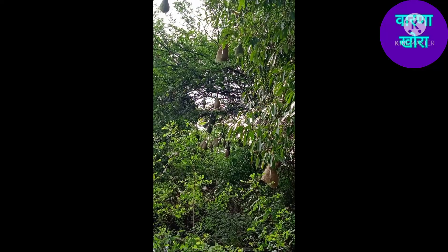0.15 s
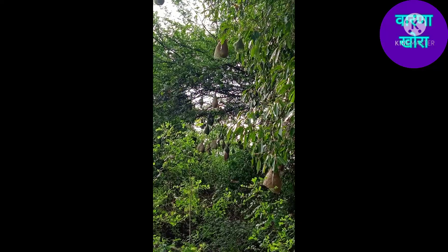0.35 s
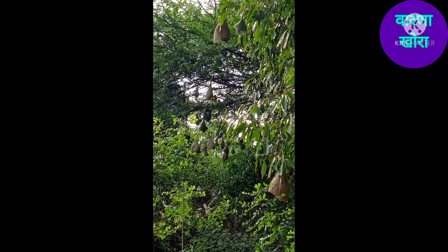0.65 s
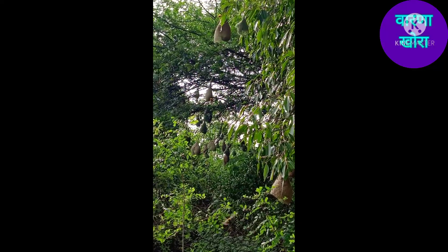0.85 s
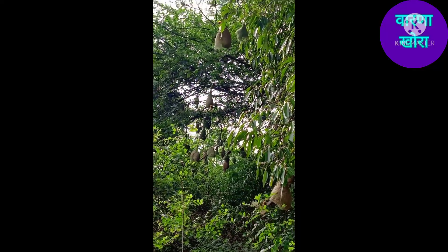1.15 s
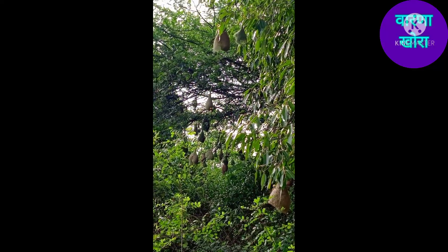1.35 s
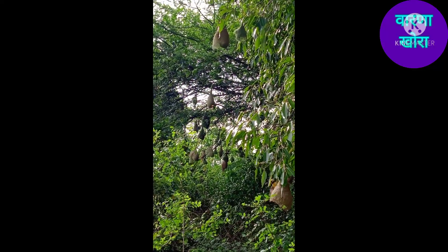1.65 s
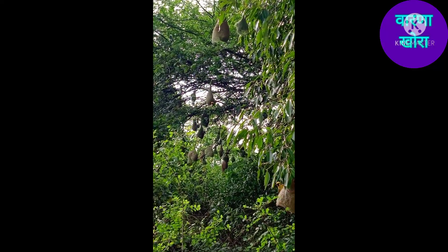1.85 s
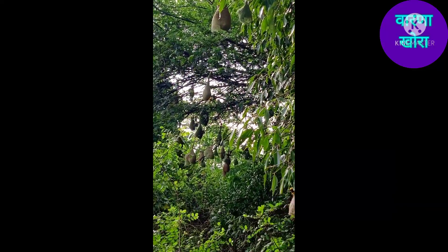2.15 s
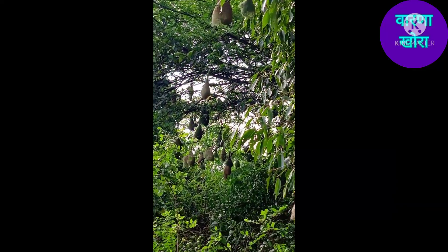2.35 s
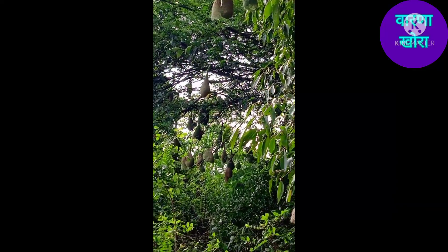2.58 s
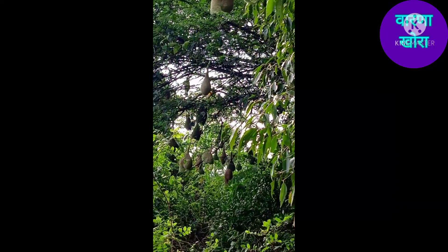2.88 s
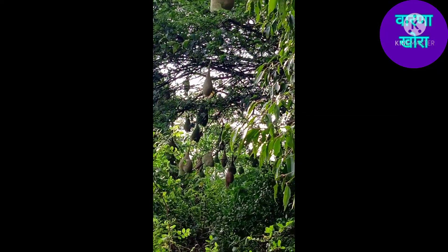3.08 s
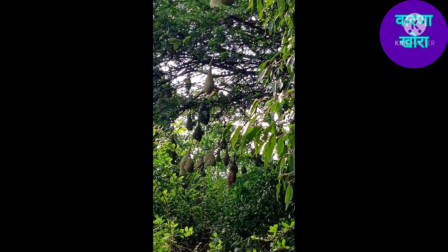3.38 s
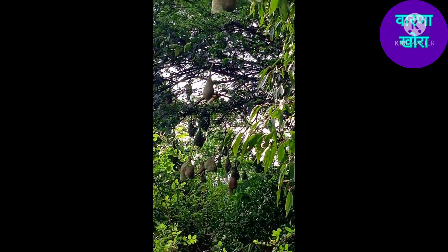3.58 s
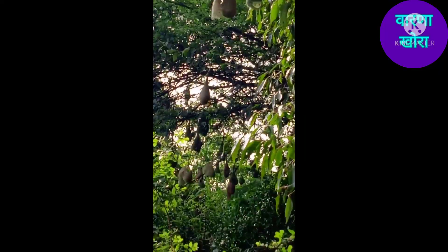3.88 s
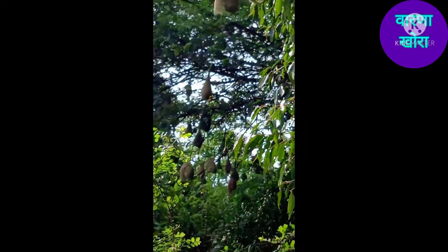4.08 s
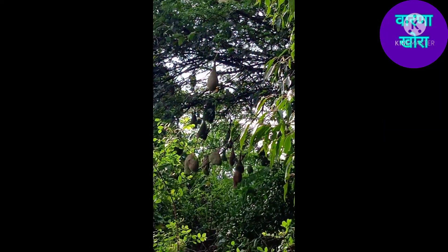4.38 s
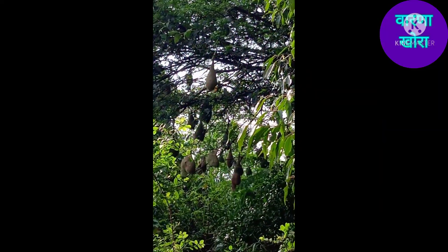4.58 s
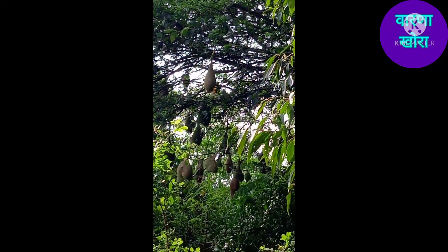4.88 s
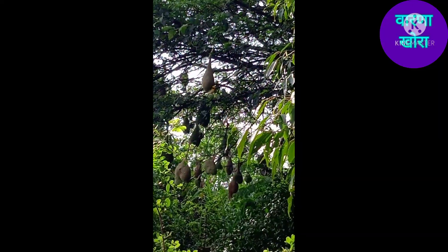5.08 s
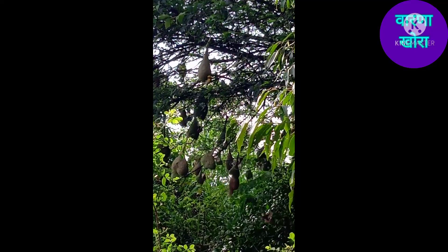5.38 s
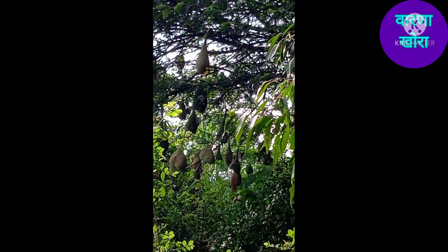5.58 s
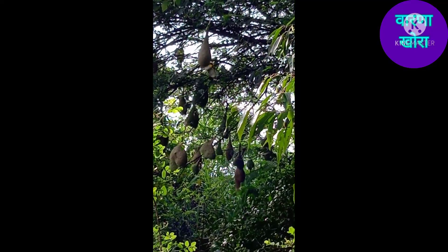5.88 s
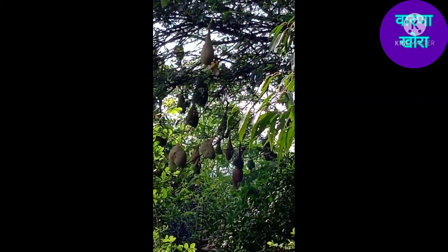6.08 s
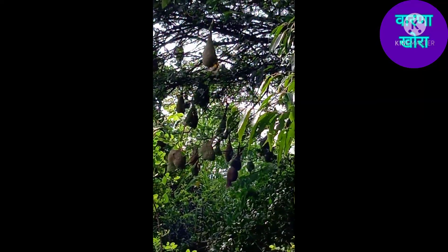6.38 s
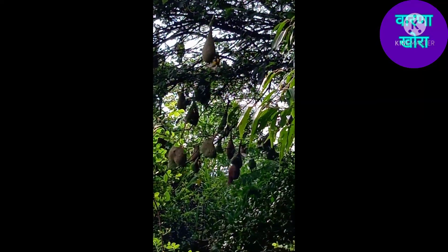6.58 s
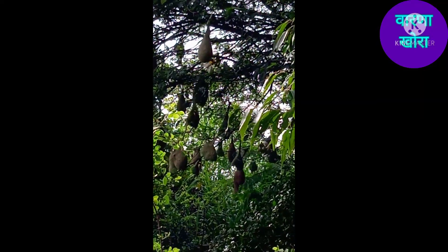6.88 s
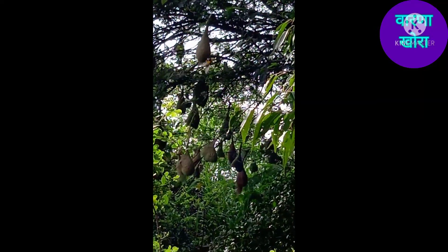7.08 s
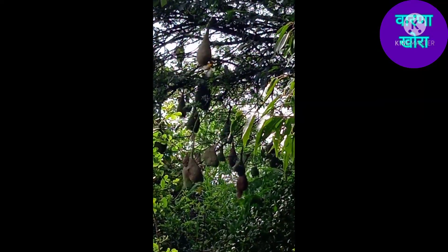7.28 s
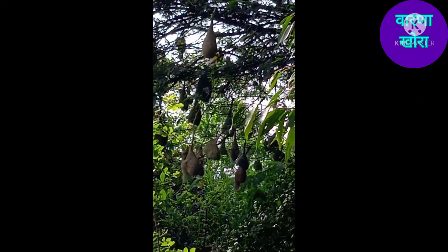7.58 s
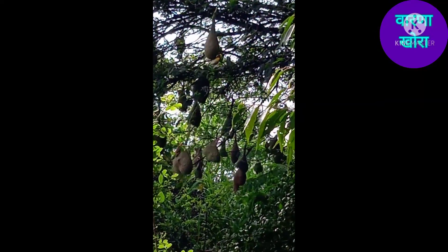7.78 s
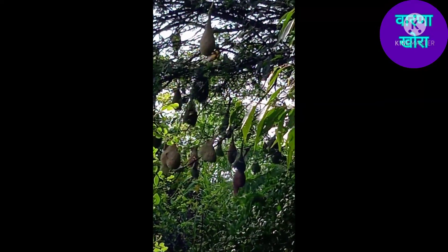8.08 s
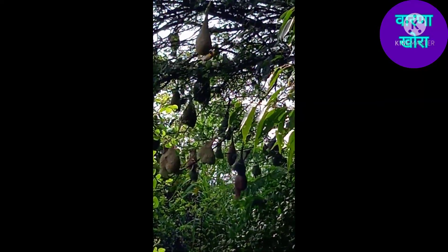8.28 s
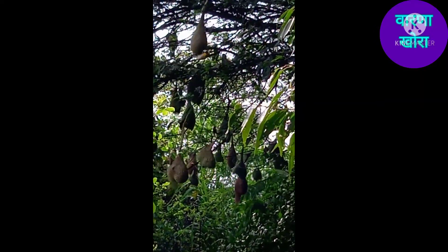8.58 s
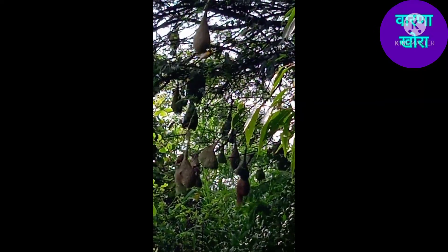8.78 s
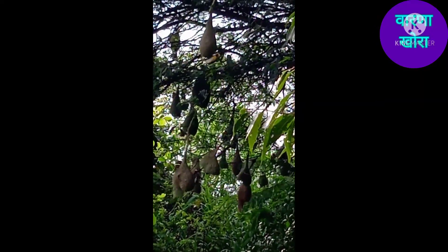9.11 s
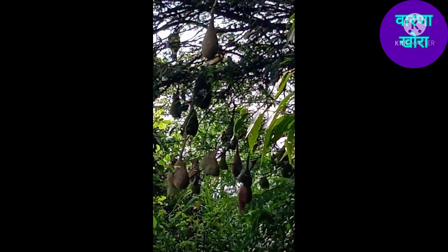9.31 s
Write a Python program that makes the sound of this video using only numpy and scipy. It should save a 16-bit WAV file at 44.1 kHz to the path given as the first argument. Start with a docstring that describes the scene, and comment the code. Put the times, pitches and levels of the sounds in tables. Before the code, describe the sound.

Outdoors in dense greenery, dozens of small birds twitter together around their nests, the chorus pulsing several times a second but never stopping. Early on, raspy chips and sharp cheeps stand out; the middle grows busier, with a strong falling wheeze near six seconds. Afterward come brief clean whistles, reedy buzzing notes and a bright whistle around seven and a half seconds. Faint outdoor air lies beneath; the microphone hears the flock at moderate distance with a few birds closer.

```python
"""Weaver bird colony in thorn trees

A colony chatters without a break; groups join in short bouts of thin high notes, cheeps and falling chips.
Nearer birds stand out with chips, cheeps, reedy calls, clean whistles and one long falling wheeze.
Each voice is a harmonic tone modulated in frequency and amplitude; raspy calls also carry a noise hiss.
Decaying noise echoes stand for leaves and branches that scatter every call.
Shaped noise gives the faint outdoor rumble, the high sizzle and two soft rustles; sines give a faint hum."""
import sys
import numpy as np
from scipy import signal
from scipy.fft import rfft, irfft, next_fast_len
from scipy.io import wavfile
from scipy.ndimage import uniform_filter1d, map_coordinates

SR = 44100
rng = np.random.default_rng(int(sys.argv[2]) if len(sys.argv) > 2 else 0)


def digitize_waveform(pressure):
    """Quantize a signal to 16-bit integers and store it at the path in sys.argv[1].

    Rows of a 2-D input are taken as channels; values are limited to [-1, 1].
    """
    field = np.atleast_2d(pressure).T
    bounded = np.clip(field, -1, 1)
    quanta = np.round(bounded * 32767).astype(np.int16)
    wavfile.write(sys.argv[1], SR, quanta)


N = 416744
TIME = np.arange(N) / SR
TOP_HZ = 15550  # upper band limit

# Spectrum of still outdoor air: frequency_hz, relative_density_db
AIR_SPECTRUM = [(25, -16), (45, -20), (58, 4.5), (80, -1), (150, -3), (250, -13), (550, -16.5), (950, -15),
                (1300, -17), (8000, -28), (12500, -36.5), (15000, -32)]
# Lines of a faint far-off hum: frequency_hz, relative_level_db
HUM_LINES = [(288, -2.5), (346, -2), (403, -3.5), (461, -4)]
# Level of the hum: time_s, level_db
HUM_LEVEL = [(0, -88), (.8, -84), (1.4, -83), (2, -92), (9.4, -92.5)]
# Strokes of soft rustling: start_s, length_s, peak_level_db
RUSTLES = [(2.146, 0.35, -73.5), (6.641, 0.048, -70.5)]
# Spectrum of the rustling: frequency_hz, relative_density_db
RUSTLE_SPECTRUM = [(100, -19), (800, 1), (2500, -9), (8000, -43)]
# Level of the thin, high sizzle above the chorus: time_s, level_db
SIZZLE_LEVEL = [(0, -71), (.8, -73), (1.6, -87), (4.3, -85), (5.3, -80.5), (5.65, -66.5), (5.88, -63.5),
                (6.3, -74), (6.8, -83), (8.8, -98), (9.4, -68)]
# Spectrum of the sizzle: frequency_hz, relative_density_db
SIZZLE_SPECTRUM = [(6000, -21), (7500, 3), (9500, 4), (12800, -11), (15000, 1)]
# Decay time of the echo from the farther trees: frequency_hz, t60_s
TREE_DECAY = [(4000, 0.67), (12000, 0.28)]
# Spectrum of the hiss that rides on a raspy call: frequency_hz, relative_density_db
RASP_SPECTRUM = [(3000, -30), (7000, -5), (8000, -6), (9600, -2), (11300, -11), (13200, -17), (15000, -1)]
# Strength with which the farthest birds are heard at each pitch: frequency_hz, relative_level_db
CARRY_SPECTRUM = [(1100, -45), (1500, -22.5), (2000, -17.5), (2550, -8), (3700, -2), (5100, 3),
                  (6600, -10.5), (7300, -21.5), (9000, -51)]
# Level of the far birds' low chirps: time_s, level_db
LOW_BIRD_LEVEL = [(0, -64), (1.5, -76), (3, -75.5), (4.5, -72), (5.6, -67.5), (7.2, -63), (8.6, -72),
                  (9.4, -65.5)]
# Unbroken chatter of the colony, before the offset of each kind of call: time_s, relative_level_db
CHATTER_LEVEL = [(0, -46.5), (.8, -49.5), (1.42, -57), (2.05, -55.5), (2.4, -54), (2.6, -57.5), (2.77, -52),
                 (3.05, -52.5), (3.85, -53.5), (4.33, -62), (4.7, -53.5), (5.6, -48), (6, -49),
                 (6.8, -53.5), (8.05, -50.5), (8.3, -56), (8.7, -51.5), (9.45, -52.5)]
# Bouts of a group calling together, before the same kind of offset:
# start_s, length_s, cheep_relative_level_db, chip_relative_level_db
BOUTS = [(-0.04, 0.088, -48.5, -52), (0.185, 0.31, -47.5, -57), (0.458, 0.16, -50, -55),
         (0.594, 0.23, -42.5, -53), (0.75, 0.19, -50, -53.5), (0.904, 0.22, -47.5, -48),
         (1.118, 0.24, -49, -54), (1.281, 0.16, -43.5, -55.5), (1.423, 0.25, -49.0, -49.5),
         (1.71, 0.17, -51, -51.0), (1.91, 0.29, -50.5, -65), (2.19, 0.13, -52, -58), (2.42, 0.27, -50, -61),
         (2.783, 0.25, -52.5, -53.0), (3.007, 0.37, -47.5, -69), (3.447, 0.23, -51.5, -66),
         (3.684, 0.14, -51.5, -55.5), (3.898, 0.22, -49.5, -52), (4.094, 0.093, -46, -45),
         (4.174, 0.22, -57.5, -51), (4.364, 0.26, -48, -48.5), (4.598, 0.44, -44.5, -51.5),
         (5.0, 0.32, -43.5, -53), (5.272, 0.26, -44, -47), (5.646, 0.38, -43, -59), (6.07, 0.097, -44, -67),
         (6.16, 0.26, -48.5, -61), (6.58, 0.22, -49.5, -61), (6.902, 0.26, -49, -73),
         (7.074, 0.21, -71, -53), (7.273, 0.096, -47, -48), (7.43, 0.17, -59, -51.5),
         (7.66, 0.23, -54.5, -55), (7.977, 0.3, -49.5, -53.5), (8.315, 0.3, -50.5, -51.5),
         (8.73, 0.3, -47.5, -66), (9.07, 0.16, -49, -68), (9.187, 0.51, -48.5, -59)]
# Near raspy chips: start_s, length_s, start_pitch_hz, end_pitch_hz, relative_level_db
CHIPS = [(0, 0.12, 4120, 2740, -42.5), (0.29, 0.12, 5140, 3620, -45), (0.94, 0.1, 5480, 3670, -43),
         (1.02, 0.092, 4270, 2530, -47.5), (1.37, 0.046, 6120, 5260, -45.5),
         (1.495, 0.039, 4400, 2630, -43.5), (1.57, 0.12, 3850, 3105, -47.5), (1.71, 0.038, 6000, 3410, -45),
         (1.775, 0.04, 4610, 2670, -49.5), (2.07, 0.053, 4800, 2580, -49), (2.14, 0.047, 6100, 5000, -47.5),
         (2.21, .06, 6000, 4860, -48), (2.438, 0.029, 5740, 4430, -43), (2.47, 0.034, 3500, 2690, -45.5),
         (2.83, 0.033, 5030, 2560, -46.5), (3.085, 0.033, 4200, 2500, -48), (3.43, 0.039, 3940, 2660, -49),
         (3.917, 0.0262, 5950, 4880, -40.5), (4.12, 0.028, 5500, 4670, -39.5),
         (4.14, 0.033, 4950, 2980, -51), (4.165, 0.036, 3600, 3320, -46.5), (4.265, 0.027, 3450, 3270, -48),
         (4.65, 0.035, 5900, 4620, -44), (4.76, 0.09, 4060, 3504, -46.5), (5.05, 0.082, 4110, 3330, -43.5),
         (5.13, 0.064, 3900, 2904, -44.5), (5.54, 0.038, 4220, 3440, -42), (5.72, 0.064, 5810, 3690, -40),
         (6.385, 0.016, 4120, 3200, -46.5), (7.335, 0.025, 3840, 2790, -44.5),
         (7.425, 0.035, 4220, 3830, -45.5), (7.45, 0.029, 3900, 3040, -43), (8.17, 0.058, 2100, 1570, -65),
         (8.85, 0.037, 2200, 1540, -66), (8.98, 0.021, 3680, 3410, -47.5), (9.12, 0.019, 3480, 3380, -47),
         (9.255, 0.03, 3700, 3260, -47.5)]
# Near held cheeps: start_s, length_s, mid_pitch_hz, relative_level_db
CHEEPS = [(.06, 0.044, 6560, -53), (0.217, 0.13, 4800, -48), (0.467, 0.071, 5250, -45),
          (0.541, 0.032, 4940, -41.5), (0.588, 0.036, 6730, -60), (0.666, 0.058, 5280, -41),
          (0.798, 0.13, 4940, -40.5), (1.218, 0.055, 4955, -44), (1.303, 0.017, 5090, -38.5),
          (1.311, .04, 6430, -55), (1.335, 0.06, 5050, -49), (1.474, 0.053, 4950, -44.5),
          (1.749, 0.062, 5085, -45), (2.001, 0.14, 4860, -45.5), (2.064, 0.02, 5120, -39),
          (2.577, 0.12, 4920, -49), (2.697, 0.032, 4800, -46), (2.808, 0.025, 5160, -39),
          (3.06, 0.03, 5030, -45.5), (3.778, 0.086, 4930, -48.5), (4.419, 0.03, 5100, -45.5),
          (4.52, 0.063, 4870, -41.5), (4.91, 0.083, 5100, -41), (5.181, 0.08, 4980, -41.5),
          (5.699, 0.046, 6260, -42), (7.89, 0.048, 6770, -66), (7.99, .05, 6800, -66),
          (8.76, 0.033, 4960, -47), (9.08, 0.097, 6050, -53.5), (9.413, 0.052, 5980, -56)]
# Near clean whistles: start_s, length_s, mid_pitch_hz, relative_level_db
WHISTLES = [(1.99, 0.051, 4300, -52), (2.22, 0.19, 4033, -50), (2.53, 0.11, 2284, -68),
            (6.243, 0.037, 4890, -38.5), (6.264, .04, 4760, -41), (6.29, 0.048, 4640, -47),
            (6.415, 0.093, 3975, -49.5), (6.49, 0.049, 3965, -43), (6.532, 0.065, 3980, -55),
            (6.575, 0.076, 2615, -57.5), (6.82, 0.11, 2280, -57), (7.57, 0.05, 5080, -50),
            (7.61, 0.054, 5050, -33), (7.656, 0.022, 5050, -39), (7.701, .025, 5070, -46),
            (7.665, 0.07, 4800, -44), (7.73, 0.132, 4570, -40.5), (7.87, 0.088, 2720, -59),
            (8.11, 0.078, 2120, -65), (8.28, 0.11, 2110, -67), (8.31, 0.079, 4230, -51.5),
            (9.21, 0.076, 2230, -63)]
# Near nasal, reedy calls: start_s, length_s, start_pitch_hz, level_db
REEDY_CALLS = [(6.617, .17, 4820, -49.5), (7.112, .15, 4760, -45)]
# Course of the long falling wheeze: time_s, pitch_hz, level_db
WHEEZE = [(5.82, 7000, -52), (5.86, 6100, -48), (5.877, 5400, -40), (5.9, 5120, -32.5), (5.92, 4900, -39),
          (5.95, 4620, -39.5), (6, 4200, -41), (6.05, 3800, -40), (6.08, 3370, -42), (6.105, 3030, -39.5),
          (6.15, 2450, -56)]

BOUT_ATTACK_S, BOUT_RELEASE_S = 0.04, 0.056  # how fast a group joins in and stops
HIGH_LEAD_S, CHIP_LAG_S = 0.0077, 0.012  # high notes open a bout early, chips come late
HIGH_FADE_DB, CHIP_RISE_DB = 3.5, 5.5  # over a bout the high notes give way to the chips
CHEEP_SAG = 0.0335  # share of its pitch that a cheep loses
WHISTLE_SAG_PER_S = 0.29  # share of its pitch that a whistle loses in a second
REEDY_FALL_HZ_PER_S, REEDY_BUZZ_HZ = 2700, 360  # glide, and the beat that sets the sideband spacing


def amp(db):
    """Amplitude ratio: twenty decibels make a factor of ten."""
    return 10 ** (np.asarray(db) / 20)


def unit(x):
    """Normalisation: the signal is scaled to rms 1."""
    return x / np.sqrt(np.mean(x ** 2) + 1e-20)


def along(points, hz):
    """Interpolation of (frequency, value) points on a logarithmic frequency axis."""
    point_hz, value = np.transpose(points)
    return np.interp(np.log(hz + 1), np.log(point_hz + 1), value)


def curves(rows, t):
    """Linear interpolation of every column after the time, read at the times t."""
    times, *columns = np.transpose(rows)
    return [np.interp(t, times, column) for column in columns]


def wobble(t, rate):
    """Band-limited fluctuation: a smooth curve through random knots, rate knots a second."""
    knots = rng.standard_normal(int(t[-1] * rate) + 4)
    return map_coordinates(knots, [t * rate + 1], order=2, mode="mirror")


def filtered(x, response):
    """Linear filtering: the spectrum is multiplied by a response of frequency."""
    size = next_fast_len(N + SR // 2)
    spectrum = rfft(x, size) * response(np.fft.rfftfreq(size, 1 / SR))
    return irfft(spectrum, size)[:N]


def noise(spectrum):
    """Coloured noise: white noise shaped by a spectrum, at rms 1."""
    return unit(filtered(rng.standard_normal(N), lambda hz: amp(along(spectrum, hz))))


def add(track, start_s, sound):
    """Superposition: a sound is summed into the track from its start."""
    start = max(int(start_s * SR), 0)
    part = track[start:start + len(sound)]
    part += sound[:len(part)]


def air():
    """Broadband background: low-weighted noise with a slightly wavering level."""
    return noise(AIR_SPECTRUM) * amp(-74.5 + 0.31 * wobble(TIME, 8.8))


def hum():
    """Line spectrum: a few sines whose phases wander sum to a wavering hum."""
    lines = [amp(db) * np.sin(2 * np.pi * hz * TIME + wobble(TIME, 24)) for hz, db in HUM_LINES]
    return unit(sum(lines)) * amp(curves(HUM_LEVEL, TIME)[0])


def rustling():
    """Gated noise: each soft rustle is coloured noise under a bell-shaped envelope."""
    strokes = np.zeros(N)
    for start_s, length_s, db in RUSTLES:
        add(strokes, start_s, amp(db) * np.hanning(int(length_s * SR)))
    return noise(RUSTLE_SPECTRUM) * strokes


def sizzle():
    """High-band noise: a thin sizzle swells and flickers in level."""
    return noise(SIZZLE_SPECTRUM) * amp(curves(SIZZLE_LEVEL, TIME)[0] + 2.0 * wobble(TIME, 22))


def trees(x, leaves_db, far_db, leaves_t60=0.33):
    """Scattering: near leaves answer at once, farther trees with a frequency-dependent decaying tail."""
    t = np.arange(SR // 2) / SR
    leaves = rng.standard_normal(len(t)) * amp(-60 * t / leaves_t60) * (t > .002)
    hz, frame_s, cells = signal.stft(rng.standard_normal(len(t)), SR, nperseg=256)
    decay = amp(-60 * frame_s / along(TREE_DECAY, hz)[:, None])
    tail = signal.istft(cells * decay, SR)[1][:len(t)]
    echo = amp(leaves_db) * leaves / np.linalg.norm(leaves) + amp(far_db) * tail / np.linalg.norm(tail)
    scattered = x + signal.fftconvolve(x, echo)[:N]
    return scattered / np.sqrt(1 + np.sum(echo ** 2))


def hiss(voice, grows=0.93, flicker_db=2):
    """Modulated noise: hiss follows every flutter of a raspy voice; forceful calls hiss the most."""
    strength = np.sqrt(np.abs(uniform_filter1d(voice ** 2, size=90)))
    envelope = unit(strength ** grows * amp(flicker_db * wobble(TIME, 17)))
    return noise(RASP_SPECTRUM) * envelope * np.std(voice)


def syrinx(pitch, rasp, flutter_db, jitter_hz=1100, flutter_hz=260):
    """Frequency modulation: buzz and jitter shake a three-harmonic tone, while its strength flutters."""
    t = np.arange(len(pitch)) / SR
    buzz_hz = 200 * rng.uniform(0.507, 1.6)
    buzz = np.sin(2 * np.pi * buzz_hz * t + wobble(t, 60))
    # rasp is the shake as a share of a typical 4 kHz voice
    shake_hz = 4000 * rasp * (buzz + wobble(t, jitter_hz))
    phase = 2 * np.pi * np.cumsum(pitch + shake_hz) / SR
    tone = np.sin(phase) + amp(-37) * np.sin(2 * phase) + amp(-47) * np.sin(3 * phase)
    flutter = amp(flutter_db * (wobble(t, flutter_hz) + .5 * buzz))
    return unit(tone * flutter)


def call(length_s, start_hz, end_hz, rasp, flutter_db):
    """Gliding tone: one note of rms 1 swells, moves linearly in pitch and fades."""
    progress = np.linspace(0, 1, max(int(length_s * SR), SR // 100))
    swell = np.abs(np.sin(np.pi * progress ** .8)) ** .7
    pitch = start_hz + (end_hz - start_hz) * progress
    return unit(swell * syrinx(pitch, rasp, flutter_db))


def crowd(count, length_s, start_hz, end_hz, spread, rasp, flutter_db, distance_db):
    """Incoherent superposition: many birds call, each at its own moment, pitch and distance."""
    track = np.zeros(N)
    moments = (np.arange(count) + rng.uniform(-1, 1, count)) * TIME[-1] / count
    traits = np.clip(rng.standard_normal((count, 4)), -2, 2)
    for moment, (voice, slope, slow, near) in zip(moments, traits):
        note_s = length_s * np.exp(.35 * slow)
        first_hz = start_hz * np.exp(spread * voice)
        last_hz = end_hz * np.exp(spread * (voice + .5 * slope))
        note = call(note_s, first_hz, last_hz, rasp, flutter_db)
        add(track, moment, amp(distance_db * near) * note)
    # the birds fill each other's pauses: dividing by the smoothed level evens the chorus
    power = uniform_filter1d(track ** 2, size=SR // 18)
    power = np.abs(uniform_filter1d(power, size=SR // 18))
    return unit(track / np.sqrt(power + 0.027 * power.mean()))


def activity(delay_s, tilt_db, chatter_db, bout_db, levels):
    """Power addition: steady chatter plus each bout's attack, hold and release, as a level in dB."""
    power = amp(curves(CHATTER_LEVEL, TIME)[0] + chatter_db) ** 2
    for (start_s, length_s, *_), db in zip(BOUTS, levels):
        t = np.arange(0, length_s, 1 / SR)
        attack = np.minimum(t / BOUT_ATTACK_S, 1)
        release = np.minimum((length_s - t) / BOUT_RELEASE_S, 1)
        gain = amp(db + bout_db + tilt_db * (t / length_s - .5))
        add(power, start_s + delay_s, (attack * release * gain) ** 2)
    return 10 * np.log10(power)


def far_twitter():
    """Spectral weighting: the farthest voices pass the carrying curve and blur into a like-coloured hiss."""
    voices = crowd(count=1700, length_s=.03, start_hz=3903, end_hz=3754, spread=.26,
                   rasp=0.022, flutter_db=4.0, distance_db=1)
    carried = unit(filtered(voices, lambda hz: amp(along(CARRY_SPECTRUM, hz))))
    return carried + amp(-1) * noise(CARRY_SPECTRUM)


def flock():
    """Layered chorus: four kinds of call, each with its own level course, over a fine far twitter."""
    _, _, cheep_levels, chip_levels = np.transpose(BOUTS)
    high_db = activity(-HIGH_LEAD_S, -HIGH_FADE_DB, chatter_db=-6.5, bout_db=-7, levels=cheep_levels)
    cheeps_db = activity(0, 0, chatter_db=-4, bout_db=0.3, levels=cheep_levels)
    chips_db = activity(CHIP_LAG_S, CHIP_RISE_DB, chatter_db=-1.5, bout_db=-0.13, levels=chip_levels)
    low_db, = curves(LOW_BIRD_LEVEL, TIME)
    twitter_db = (chips_db + high_db) / 2 + 1.4
    chips = crowd(count=760, length_s=.028, start_hz=3954, end_hz=3694, spread=.15,
                  rasp=0.031, flutter_db=2.5, distance_db=1.0)
    cheeps = crowd(count=400, length_s=0.061, start_hz=5047, end_hz=4930, spread=.023,
                   rasp=0.026, flutter_db=3.5, distance_db=1.0)
    high = crowd(count=620, length_s=.03, start_hz=5645, end_hz=5450, spread=.065,
                 rasp=.025, flutter_db=0.0, distance_db=-0.5)
    low = crowd(count=420, length_s=.04, start_hz=2280, end_hz=2202, spread=0.11,
                rasp=0.024, flutter_db=3.5, distance_db=1.5)
    calls = chips * amp(chips_db) + cheeps * amp(cheeps_db) + high * amp(high_db) + low * amp(low_db)
    return calls + far_twitter() * amp(twitter_db)


def near_birds(notes, gain_db, rasp, flutter_db):
    """Superposition of separate notes: the calls of single birds close by."""
    track = np.zeros(N)
    for start_s, length_s, start_hz, end_hz, db in notes:
        add(track, start_s, amp(db + gain_db) * call(length_s, start_hz, end_hz, rasp, flutter_db))
    return track


def whistling():
    """Constant relative glide rate: whistles sink steadily, so long ones lose the largest share of pitch."""
    notes = []
    for start_s, length_s, hz, db in WHISTLES:
        half_sag = WHISTLE_SAG_PER_S * length_s / 2
        notes.append((start_s, length_s, hz * (1 + half_sag), hz * (1 - half_sag), db))
    return near_birds(notes, gain_db=-0.7, rasp=0.004, flutter_db=1.3)


def chipping():
    """Strong frequency modulation: a deep shake makes the gliding chips raspy."""
    return near_birds(CHIPS, gain_db=-1.4, rasp=0.04, flutter_db=2.5)


def cheeping():
    """Constant pitch ratio: every near cheep sags by the same share of its pitch."""
    half_sag = CHEEP_SAG / 2
    notes = [(start_s, length_s, hz * (1 + half_sag), hz * (1 - half_sag), db)
             for start_s, length_s, hz, db in CHEEPS]
    return near_birds(notes, gain_db=-0.5, rasp=0.026, flutter_db=3.0)


def reedy(depth=0.75, rasp=0.015, flutter_db=2):
    """Amplitude modulation: a second oscillation beats on a falling note and gives it sidebands."""
    track = np.zeros(N)
    for start_s, length_s, hz, db in REEDY_CALLS:
        note = call(length_s, hz, hz - REEDY_FALL_HZ_PER_S * length_s, rasp, flutter_db)
        t = np.arange(len(note)) / SR
        beat = 1 + depth * np.sin(2 * np.pi * REEDY_BUZZ_HZ * t + wobble(t, 40))
        add(track, start_s, amp(db) * unit(note * beat))
    return track


def wheeze(flutter_db=3.5, throb_hz=85, throb_db=-2.5):
    """Combined modulation: a throbbing, buzzy note slides down over an octave and clears as it falls."""
    t = np.arange(WHEEZE[0][0], WHEEZE[-1][0], 1 / SR)
    pitch, db = curves(WHEEZE, t)
    rasp = np.linspace(.045, .014, len(t))
    throb = amp(throb_db * np.sin(2 * np.pi * throb_hz * t))
    note = unit(throb * syrinx(pitch, rasp, flutter_db))
    track = np.zeros(N)
    add(track, t[0], amp(db) * note * signal.windows.tukey(len(t), .1))
    return track


def scene():
    """Superposition of fields: still air, sizzle, and the flock and near birds among the trees."""
    background = air() + hum() + rustling()
    colony = flock()
    far = trees(colony + amp(-29) * hiss(colony), leaves_db=-10.0, far_db=-10.5)
    raspy = chipping() + cheeping() + reedy() + wheeze()
    voices = raspy + amp(-34.5) * hiss(raspy) + whistling()
    near = trees(voices, leaves_db=-15, far_db=-14, leaves_t60=.1)
    return (background + sizzle() + far + near)[None]


def record(dry):
    """Band limitation: nothing is kept at or above the upper limit."""
    return filtered(dry[0], lambda hz: hz < TOP_HZ)[None]


dry = scene()
out = record(dry)
digitize_waveform(out)
```